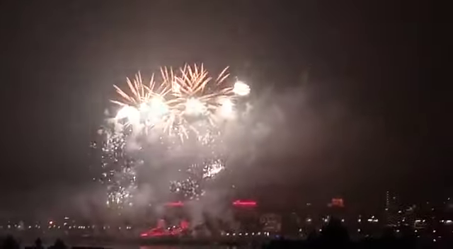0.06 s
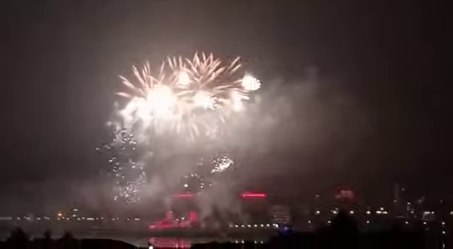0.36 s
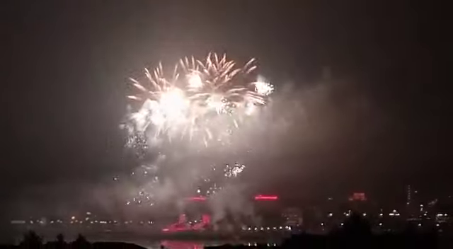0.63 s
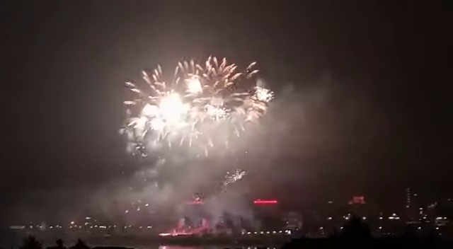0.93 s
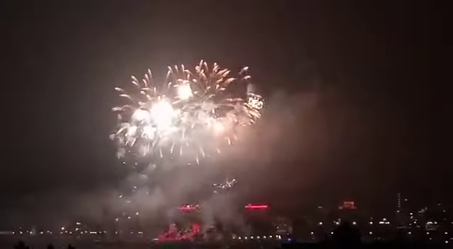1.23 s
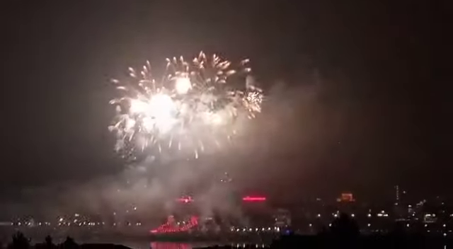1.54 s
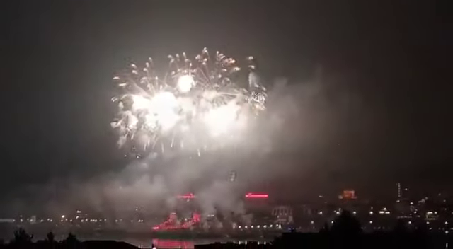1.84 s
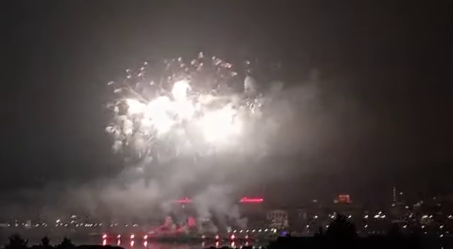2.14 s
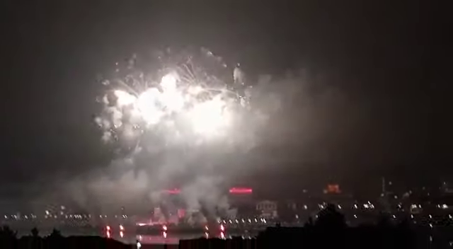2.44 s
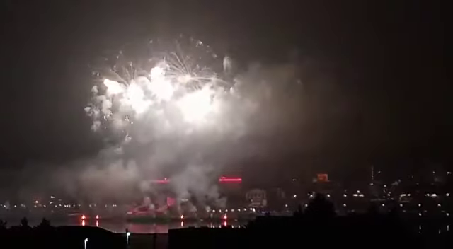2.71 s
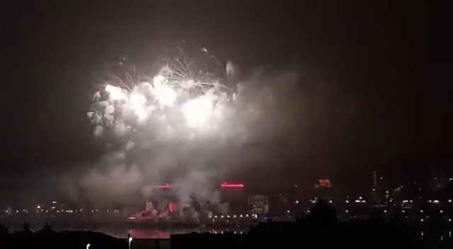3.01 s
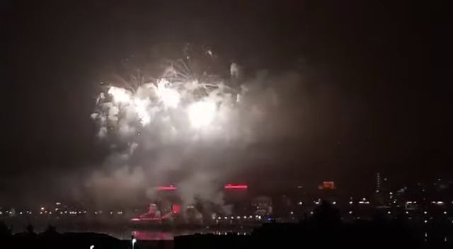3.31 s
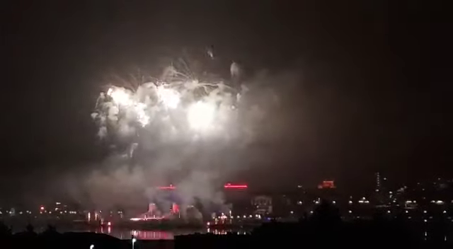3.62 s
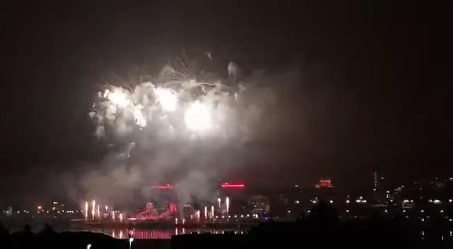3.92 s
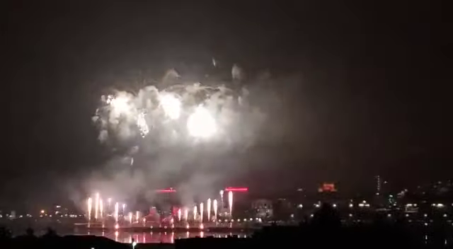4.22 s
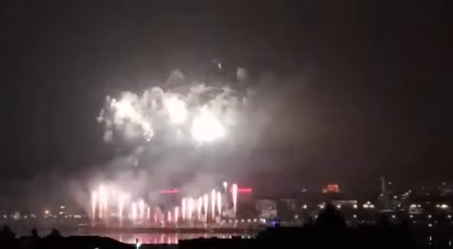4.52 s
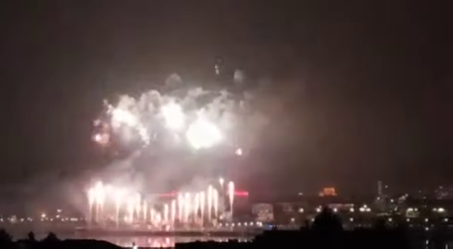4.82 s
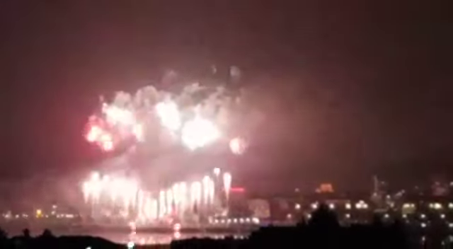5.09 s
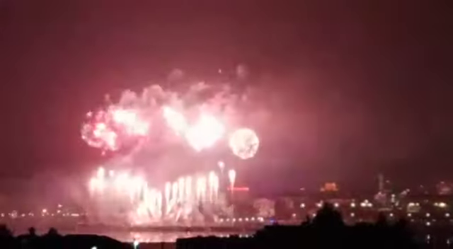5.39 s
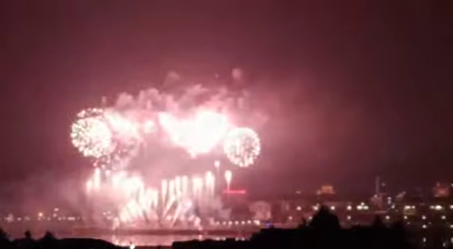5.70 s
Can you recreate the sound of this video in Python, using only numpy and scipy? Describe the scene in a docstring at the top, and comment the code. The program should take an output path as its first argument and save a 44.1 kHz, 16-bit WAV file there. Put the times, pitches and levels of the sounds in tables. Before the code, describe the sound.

Fireworks burst far away over a city. A soft rush of crackle and a low rumble come first, then a quick volley of hollow, dull bangs as the crackle dies away. Scattered bangs follow, and after a short lull three heavy, low shells go off with a fresh swell of crackle. Heard in stereo from among buildings, each burst slaps off nearby walls and returns as softer echoes.

```python
"""Among city buildings, a stereo microphone hears fireworks burst far off.
Each shell sends a pressure pulse with a hollow knock, dulled by the air, that slaps the nearby walls,
booms briefly between them and returns from the city. An opening rush of crackle dies away under the
first volley; dull thuds rumble on until three heavy, low shells burst. Soft rustles, very short ticks
of hiss and thin wavering tones lie faintly on top."""
import sys
import numpy as np
from scipy.fft import rfft, irfft, next_fast_len
from scipy.io import wavfile
from scipy.ndimage import map_coordinates

SR = 44100
rng = np.random.default_rng(int(sys.argv[2]) if len(sys.argv) > 2 else 0)


def waveform_to_disk(signal):
    """Save audio, clipped to [-1, 1], as 16-bit WAV at the path in sys.argv[1]."""
    frames = np.transpose(np.atleast_2d(signal))
    scaled = np.clip(frames, -1, 1) * 32767
    samples = np.round(scaled).astype(np.int16)
    wavfile.write(sys.argv[1], SR, samples)


N = 253575


def amp(db):
    """Decibels to gain."""
    return np.exp(np.asarray(db) * np.log(10) / 20)


def unit(x):
    """x at rms 1."""
    return x / np.sqrt(np.mean(x ** 2) + 1e-20)


def along(points, hz):
    """(frequency, value) points read on a log axis."""
    frequencies, values = np.transpose(points)
    return np.interp(np.log(hz + 1), np.log(frequencies + 1), values)


def filtered(x, response):
    """x times a response of frequency."""
    size = next_fast_len(N + SR // 2)
    return irfft(rfft(x, size) * response(np.fft.rfftfreq(size, 1 / SR)), size)[..., :N]


def noise(spectrum):
    """Stereo noise at rms 1, coloured by (frequency, level) points."""
    return unit(filtered(rng.standard_normal((2, N)), lambda hz: amp(along(spectrum, hz))))


def delay(hz, s):
    """Response of a path s seconds long."""
    return np.exp(-2j * np.pi * hz * s)


def dull(hz, corner_hz):
    """Rough surfaces and long paths lose the treble."""
    return 1 / (1 + 1j * hz / corner_hz)


def add(out, s, spectrum):
    """Add one second of stereo sound, given as a spectrum, at time s."""
    lead = SR // 100  # room for the rise ahead of the peak
    hz = np.fft.rfftfreq(SR, 1 / SR)
    out[:, round(s * SR) - lead:][:, :SR] += irfft(spectrum * delay(hz, lead / SR))


# Stereo width of scattered sound at the microphone: (frequency [Hz], side minus mid [dB])
STEREO_WIDTH = [(120, -19), (250, -11.5), (500, -13), (1000, -4), (2000, 2.5)]
def spread(pair, hz):
    """Two unrelated spectra to left and right: bass alike, treble apart."""
    side = amp(along(STEREO_WIDTH, hz)) * pair[1]
    return np.array([pair[0] + side, pair[0] - side])


# Walls a few metres from the microphone: (lag [ms], reflected share [ratio], left lead [ms])
NEAR_WALLS = [(4.785, 0.13, 0.16), (7.467, 0.19, -0.61), (15.82, 0.056, -1.2), (24.75, 0.2, 0.65),
              (30.79, 0.11, 0.37)]
# Air resonances between them, deep then upper: (frequency [Hz], width [Hz], level [dB])
BOOM_MODES = [(134.3, 11, 4.5), (199.3, 24.5, 5)]
def courtyard(hz, boom_dbs, shift=1):
    """Left and right: the direct sound, slaps from nearby walls and the resonances between them."""
    sides = np.array([[-.5], [.5]])
    slaps = sum(share * delay(hz, (ms + sides * lead_ms) / 1000) for ms, share, lead_ms in NEAR_WALLS)
    boom = 0
    for (mode_hz, width_hz, db), drive_db in zip(BOOM_MODES, boom_dbs):
        damping = 1j * hz * width_hz
        boom += amp(db + drive_db) * damping / ((mode_hz * shift) ** 2 - hz ** 2 + damping)
    return 1 + slaps + boom


def swarm(spectrum, per_second, size_db, boom_dbs, diffuse_db):
    """Countless far pops of random size, partly direct and partly scattered, rms 1."""
    def arrival(hz):
        low_cut = 1 - np.exp(-(hz / 10) ** 2)
        return courtyard(hz, boom_dbs) * amp(along(spectrum, hz)) * low_cut

    chance, size = rng.random(N), rng.standard_normal(N)
    pops = (chance < per_second / SR) * amp(size_db * np.clip(size, -2, 2))
    wash = irfft(spread(rfft(rng.standard_normal((2, N))), np.fft.rfftfreq(N, 1 / SR)), N)
    return unit(filtered(unit(pops - pops.mean()) + amp(diffuse_db) * wash, arrival))


# Swells of distant crackle, an opening rush and then faint wash after the bangs:
# (start [s], start of the fade [s], relative level [dB])
CRACKLE_SWELLS = [(-.2, 1.81, -45.5), (2.95, 4.4, -69.5), (5.051, 4.4, -27)]
# Colour of their pops: (frequency [Hz], spectral level [dB])
CRACKLE_SPECTRUM = [(50, -24), (80, -25), (200, -10), (420, -1), (800, 1), (1200, -3.5), (1600, -13),
                    (2000, -28), (2600, -49), (5000, -79.5)]
def crackle(level_db=6, attack_s=0.29, fade_db_per_s=21.5):
    """Dense far pops merge into a grainy rush that swells quickly and fades slowly."""
    t, level = np.arange(N) / SR, np.zeros(N)
    for start_s, fade_s, db in CRACKLE_SWELLS:
        rise = np.clip((t - start_s) / attack_s, 0, 1)
        level += rise * amp(db - fade_db_per_s * np.maximum(t - fade_s, 0))
    pops = swarm(CRACKLE_SPECTRUM, per_second=1500, size_db=-2, boom_dbs=(-2, -2), diffuse_db=-4)
    return amp(level_db) * level * pops


# Rise and fall of the thuds across the city: (time [s], relative level [dB])
RUMBLE_LEVELS = [(0.0, -42), (1.1, -41.5), (1.62, -40), (1.82, -35.5), (2.3, -40.5), (2.75, -43.5),
                 (3.1, -41.5), (3.33, -43), (3.58, -41), (3.85, -46), (4.1, -40.5), (4.45, -45.5),
                 (4.8, -51), (5.02, -48.5), (5.15, -41), (5.75, -46)]
# Colour of those thuds: (frequency [Hz], spectral level [dB])
THUD_SPECTRUM = [(20, -24), (43, -21.5), (62, -14), (110, 1), (250, -1), (450, -3), (800, -10),
                 (1050, -19.5), (1400, -54), (2300, -91)]
def rumble(level_db=3, flutter_hz=24, flutter_db=2.4):
    """Small far bursts and their returns merge into a rumble that flutters as the echoes overlap."""
    t = np.arange(N) / SR
    contour_db = np.interp(t, *np.transpose(RUMBLE_LEVELS))
    flutter = map_coordinates(rng.standard_normal(N // 100), [t * flutter_hz])
    thuds = swarm(THUD_SPECTRUM, per_second=220, size_db=1, boom_dbs=(3, 3), diffuse_db=0)
    return amp(contour_db + level_db + flutter_db * flutter) * thuds


def blast(hz, push_ms, air_hz, edge_db=-56, low_cut_hz=60):
    """A sharp push and a longer suction, peak 1; air takes the treble, the microphone the deep bass."""
    push, bass = 2j * np.pi * hz * push_ms / 1000, 1j * hz / low_cut_hz
    air = np.exp(-(hz / air_hz) ** 2) + amp(edge_db)  # absorption leaves only a faint sharp edge
    microphone = (bass ** 2 / (bass ** 2 + 1.15 * bass + 1)) ** 2
    pulse = push / (1 + push) ** 2 * air * microphone
    return pulse / np.abs(irfft(pulse)).max()


def scatter(hz, t60_s, rise_s, spiky):
    """Stereo response of many small reflectors; spiky lets a few stand out."""
    t = np.arange(2 * (len(hz) - 1)) / SR
    sizes = np.exp(spiky * rng.standard_normal(len(t)))
    envelope = amp(-60 * t / t60_s) * (1 - np.exp(-t / rise_s)) ** 2
    tail = rng.standard_normal((2, len(t))) * sizes * envelope
    return spread(rfft(tail / np.linalg.norm(tail[0])), hz)


# Dull returns from far buildings: (time [s], relative level [dB])
FAR_RETURNS = [(1.095, -20.5), (1.217, -20), (1.294, -28.5), (1.488, -24.5), (1.539, -27), (1.847, -19.5),
               (2.31, -26), (2.37, -23), (2.448, -23.5), (2.584, -32), (2.645, -23.5), (3.171, -22),
               (3.426, -23.5), (3.477, -26.5), (3.564, -29.5), (4.209, -23), (4.268, -29), (4.344, -24.5),
               (4.396, -27), (4.528, -27.5), (4.596, -26), (4.679, -30), (4.76, -31), (4.917, -32.5),
               (5.278, -17.5), (5.44, -25), (5.523, -16), (5.692, -25)]
def returns(smear_db=-4):
    """Echoes reach the microphone late and soft, smeared into short booms."""
    out, hz = np.zeros((2, N + SR)), np.fft.rfftfreq(SR, 1 / SR)
    for s, db in FAR_RETURNS:
        push_ms = 0.99 * np.exp(0.15 * rng.standard_normal())
        thud = blast(hz, push_ms, air_hz=734) * courtyard(hz, boom_dbs=(-2, 3))
        smear = amp(smear_db) * scatter(hz, t60_s=0.15, rise_s=0.019, spiky=0.42)
        add(out, s, amp(db) * thud * (1 + smear) / 2)
    return out[:, :N]


def puffs(events, spectrum, width_s):
    """Stereo noise that swells and fades around each (time, level) event."""
    t = np.arange(N) / SR
    swell = sum(amp(db) * np.exp(-((t - s) / width_s) ** 2) for s, db in events)
    return swell * noise(spectrum)


# Faint rustles close to the microphone: (time [s], level [dB])
CLOSE_RUSTLES = [(1.284, -71.5), (1.359, -67.5)]
# Their colour: (frequency [Hz], spectral level [dB])
RUSTLE_SPECTRUM = [(2000, -17), (3600, -24.5), (4500, -13), (5000, -11), (5500, -18), (6700, -21),
                   (7300, -14), (7900, -42), (15000, -27.5)]
def rustles():
    """Soft, brief brushes of hiss with two thin bright bands."""
    return puffs(CLOSE_RUSTLES, RUSTLE_SPECTRUM, width_s=0.018)


def flutter_echo(hz, push_ms, round_trip_ms=15.8):
    """Round trips between two facing walls; the heavier the burst, the more comes round again."""
    kept = np.clip(0.41 * push_ms, 0, .7)
    return 1 / (1 - kept * delay(hz, round_trip_ms / 1000) * dull(hz, corner_hz=910))


# Building fronts farther from the microphone: (lag [s], relative level [dB])
BUILDING_FRONTS = [(.158, -28.5), (0.175, -14), (0.346, -18)]
def city_echo(hz, tail_db=-10):
    """A burst slaps back from building fronts and rolls on through the city beyond."""
    slaps = sum(amp(db) * delay(hz, lag_s) for lag_s, db in BUILDING_FRONTS)
    fronts = slaps * scatter(hz, t60_s=0.3, rise_s=0.00069, spiky=0.079)
    tail = amp(tail_db) * scatter(hz, t60_s=1.2, rise_s=0.0028, spiky=1.0)
    return (fronts + tail) * dull(hz, corner_hz=1520)


# Far bangs and a few sharp echoes of them: (time [s], relative level [dB], push length [ms],
# air cut-off [Hz], knock pitch [Hz], knock strength [ratio], upper boom drive [dB],
# lag of a second path through the air [ms], gain of that path [ratio])
FAR_BANGS = [(1.356, -12.5, 0.13, 1068, 229, 1.47, 25.5, 2.3, 0.48),
             (1.639, -13.5, 0.1, 873, 397, 2.5, 22, 1.06, 0.53),
             (1.7131, -20.5, 0.052, 857, 422, 2.85, 19, 0.99, 3.34),
             (1.7508, -7, 0.17, 977, 254.5, 2.5, 9, 1.46, 0.68),
             (1.8286, -15.5, 0.25, 1175.0, 335.4, 4.5, -2.5, 0.58, 1.9),
             (1.918, -24, 0.31, 1114, 600.0, 1.4, 17, 1.8, 0.62),
             (2.0108, -16.5, 0.3, 1150.0, 329, 0.73, 11, 2.1, 0.43),
             (2.025, -16.5, 0.22, 897, 530, 0.6, 16, 1.5, 0.29),
             (2.04, -23.5, 0.36, 944, 482, 0.82, -7, 2.0, 0.79),
             (2.143, -14.5, 0.3, 1137, 488, 0.96, 10.5, 1.71, 0.37),
             (2.2145, -12.5, 0.42, 950, 563, 3.8, 12, 2.84, 0.57),
             (2.5135, -21, 0.31, 1120, 370, 1.5, 20, 1.9, 0.38),
             (2.8241, -13, 0.28, 1167, 569.0, 1.2, 12.5, 2.12, 0.28),
             (2.8576, -19, 0.47, 1193, 518.0, 1.35, 1, 0.46, 0.14),
             (2.8836, -8.5, 0.13, 1030, 590, 1.7, 20, 1.65, 0.4),
             (3.0186, -25, 0.5, 750, 600, 1, 4, 2, 0.26),
             (3.0788, -17, 0.44, 1230, 706, 0.58, 9, 2.1, 0.31),
             (3.219, -23, 0.24, 970, 450, 3.1, 13, 0.97, 2.45),
             (3.6515, -18.5, 0.26, 1170, 520, 3.6, 15, 2.9, 0.34),
             (3.667, -17, 0.45, 844, 444, 0.79, 3.5, 0.54, 0.13),
             (3.924, -17.5, 0.38, 907, 411, 1.7, 6, 0.54, 0.26),
             (3.9809, -24, 0.29, 955, 332, 0.63, 18.5, 2.1, 0.47),
             (4.0804, -13, 0.33, 1102.0, 354, 1.4, 6, 1.92, 0.33),
             (4.0972, -27, 0.47, 850.0, 419, 0.94, 11.5, 0.7, 0.47),
             (5.0292, -3, 0.9, 1860, 966, 2.05, -12.5, 1.5, 0.22),
             (5.0995, -3, 0.67, 1417, 338.0, 1, 1, 1.39, 0.3),
             (5.187, -27.5, 0.4, 1100, 700, 1, 6, 1.8, 0.23),
             (5.204, -22.5, 0.17, 1400, 966, 2.6, 4, 1.8, 0.33),
             (5.3455, -3.5, 0.85, 1620, 299, 0.92, 0.5, 1.4, 0.16),
             (5.747, -16, 0.46, 1140, 530, 1.64, -3, 0.43, 0.13)]
# Brief, faint high fizz on each bang: (frequency [Hz], relative level [dB])
FIZZ_SPECTRUM = [(1500, -41), (2900, -5), (3500, 5.5), (4600, -1.5), (7000, -8.5), (10000, -10.5),
                 (12000, 0.5), (13500, -10), (15300, -5.5)]
def bangs(near_db=-4, fizz_db=-42, knock_q=5, typical_push_ms=0.25):
    """Each bang arrives over two paths as a knocking push, scatters nearby and wakes the city."""
    out, hz = np.zeros((2, N + SR)), np.fft.rfftfreq(SR, 1 / SR)
    detour_air = np.exp(-(hz / 2900) ** 4)  # the extra air takes the last of the treble
    for s, db, push_ms, air_hz, knock_hz, knock_gain, upper_db, second_ms, second_gain in FAR_BANGS:
        # A heavier bang keeps a sharper front, drives the deep boom harder and wakes more echo.
        weight = np.log2(push_ms / typical_push_ms)
        edge_db, deep_db, echo_db = -63 + 6.5 * weight, -7 + 6.5 * weight, -8.5 + 8 * weight
        paths = 1 + second_gain * delay(hz, second_ms / 1000)
        pulse = amp(db) * blast(hz, push_ms, air_hz, edge_db) * paths
        # The pulse overshoots for a few cycles: a hollow knock.
        damping = 1j * hz * knock_hz / knock_q
        knock = 1 + knock_gain * damping / (knock_hz ** 2 - hz ** 2 + damping)
        boom_shift = 1 + .02 * rng.standard_normal()  # each from another direction
        direct = knock * courtyard(hz, (deep_db, upper_db), boom_shift) * flutter_echo(hz, push_ms)
        near = amp(near_db) * scatter(hz, t60_s=0.064, rise_s=0.0054, spiky=0.55)
        echoes = near * dull(hz, corner_hz=1280) + amp(echo_db) * city_echo(hz)
        fizz_gain = amp(db + fizz_db + along(FIZZ_SPECTRUM, hz)) * (1 + second_gain)
        fizz = fizz_gain * scatter(hz, t60_s=.09, rise_s=.001, spiky=.7)
        add(out, s, pulse * (direct + echoes * detour_air) + fizz)
    return out[:, :N]


# Faint ticks of hiss just after some bangs: (time [s], level [dB])
HISS_TICKS = [(1.379, -63.5), (2.238, -66.5), (4.098, -65)]
# Their colour: (frequency [Hz], spectral level [dB])
TICK_SPECTRUM = [(1000, -9.5), (2600, 3.5), (5000, -8), (11000, -4), (15000, -13)]
def ticks():
    """Very short puffs of bright noise."""
    return puffs(HISS_TICKS, TICK_SPECTRUM, width_s=0.003)


# Thin tones at the edge of hearing: (start [s], length [s], pitch [Hz], level [dB])
THIN_TONES = [(2.346, 1, 2490, -88.5), (3.356, .4, 2670, -99), (3.95, 0.89, 2394, -88.5),
              (4.773, 0.31, 2675, -90)]
def thin_tones(waver_hz=16):
    """Faint, wavering tones near 2.5 kHz that swell and fade."""
    t, out = np.arange(N) / SR, np.zeros((2, N))
    waver = unit(filtered(rng.standard_normal((2, N)), lambda hz: np.exp(-(hz / waver_hz) ** 2)))
    for s, length_s, pitch_hz, db in THIN_TONES:
        progress = np.clip((t - s) / length_s, 0, 1)
        swell = np.sqrt(np.abs(np.sin(np.pi * progress)))
        tone = np.sin(2 * np.pi * pitch_hz * t + waver[::-1])
        out += amp(db) * swell * (1 + .5 * waver) * tone
    return out


# Colour of the far crackle, rumble and bangs at the microphone: (frequency [Hz], gain [dB])
DISTANCE_COLOUR = [(1500, -1.5), (1950, 2.5), (2300, -2), (2900, -6.5), (3500, 0.5), (4500, -1), (8000, 2),
                   (12000, 4)]
def scene():
    """The far fireworks share one colour; faint rustles, ticks and tones lie on top."""
    far = filtered(crackle() + rumble() + returns() + bangs(), lambda hz: amp(along(DISTANCE_COLOUR, hz)))
    return far + rustles() + ticks() + thin_tones()


# Faint steady hiss with a bright top edge: (frequency [Hz], spectral level [dB])
HISS_SPECTRUM = [(30, -15), (2500, 19), (4000, 10.5), (8000, 3.5), (10500, 8), (12200, 11.5), (13600, 5.5),
                 (15200, 15)]
def record(dry, hiss_db=-81.5, top_hz=15800):
    """A faint hiss lies under everything, and the highest treble is cut off."""
    return filtered(dry + amp(hiss_db) * noise(HISS_SPECTRUM), lambda hz: hz < top_hz)


dry = scene()
out = record(dry)
waveform_to_disk(out)
```